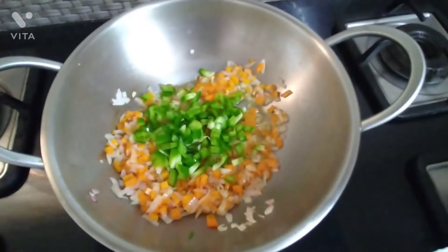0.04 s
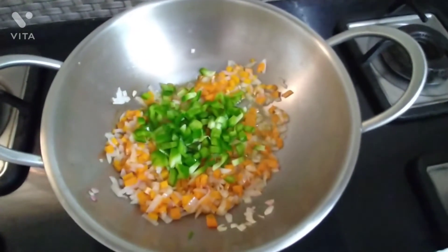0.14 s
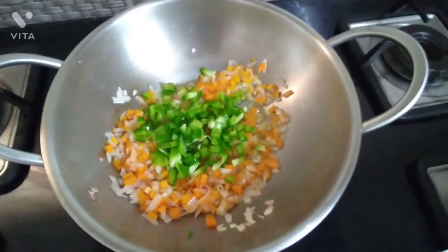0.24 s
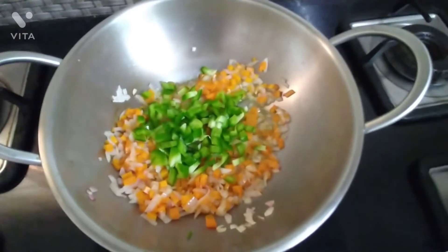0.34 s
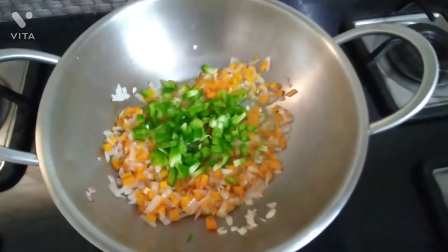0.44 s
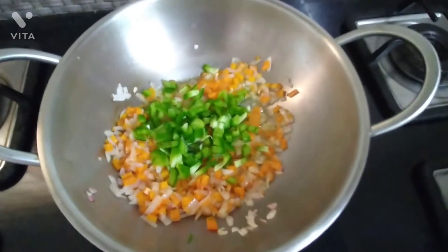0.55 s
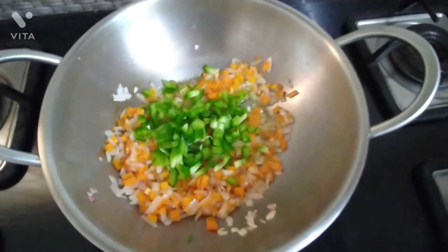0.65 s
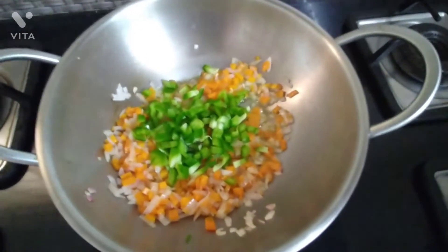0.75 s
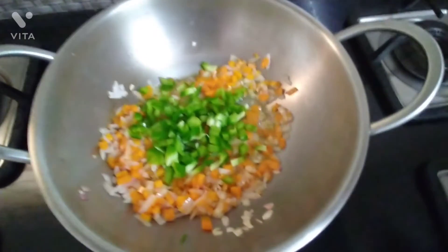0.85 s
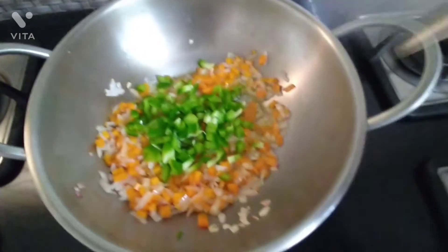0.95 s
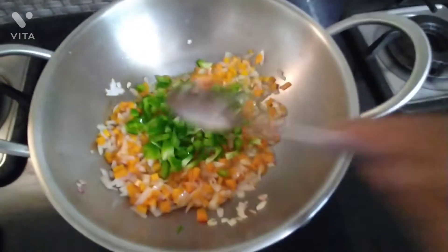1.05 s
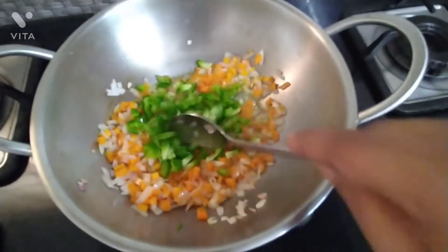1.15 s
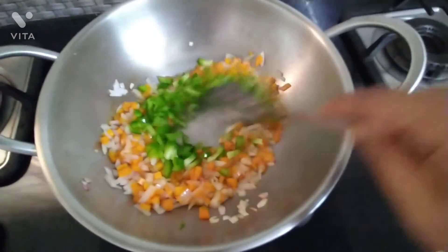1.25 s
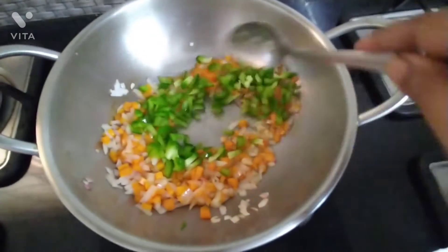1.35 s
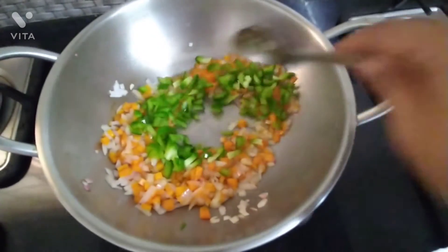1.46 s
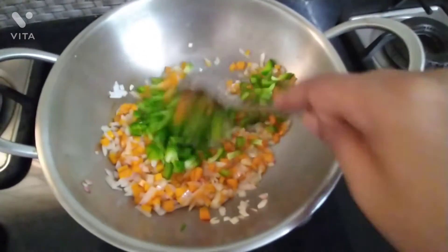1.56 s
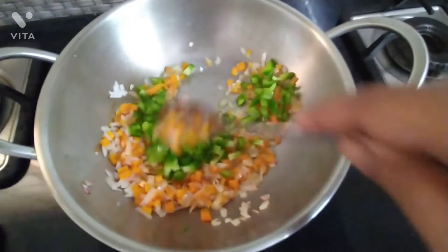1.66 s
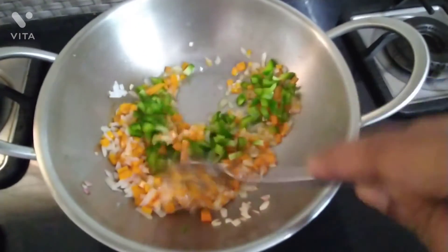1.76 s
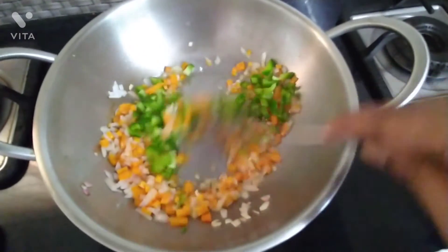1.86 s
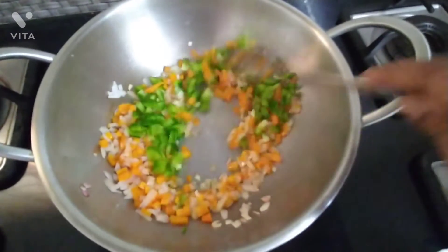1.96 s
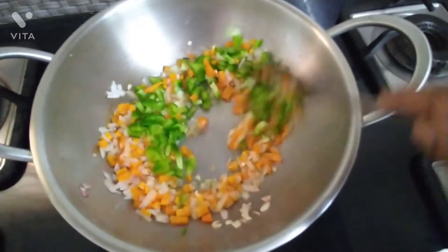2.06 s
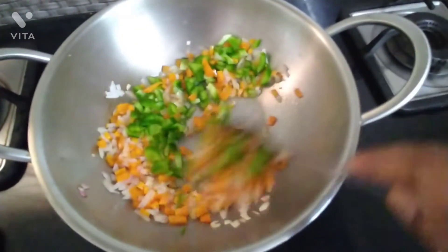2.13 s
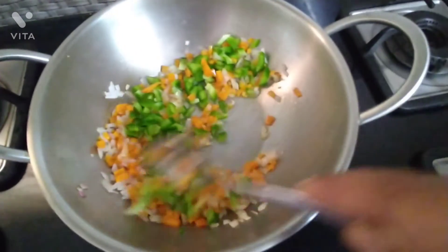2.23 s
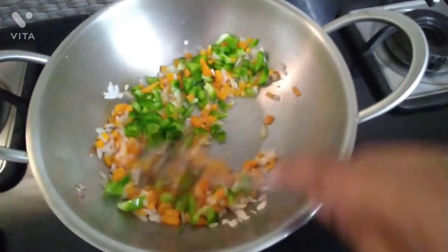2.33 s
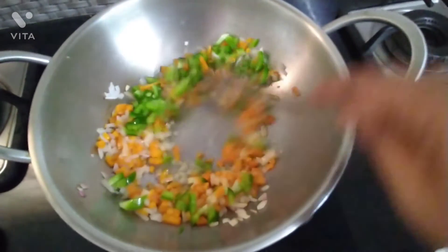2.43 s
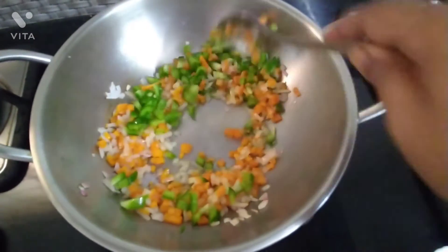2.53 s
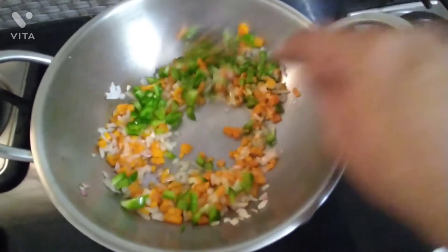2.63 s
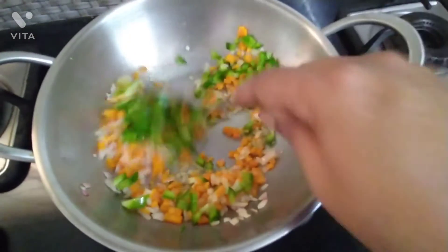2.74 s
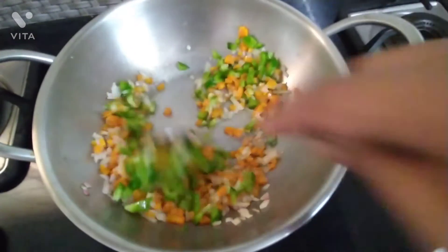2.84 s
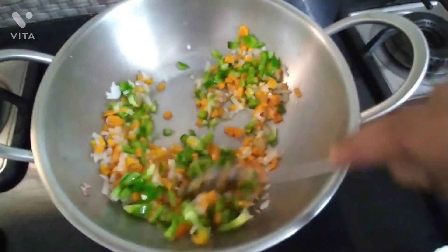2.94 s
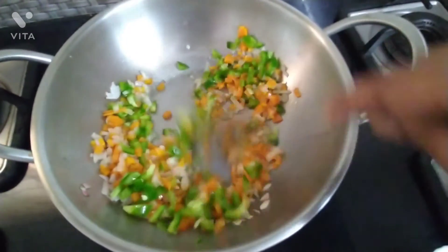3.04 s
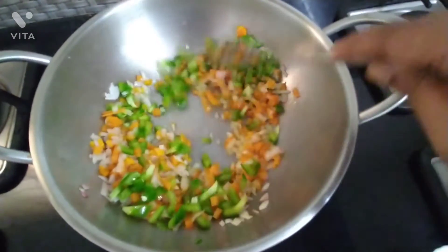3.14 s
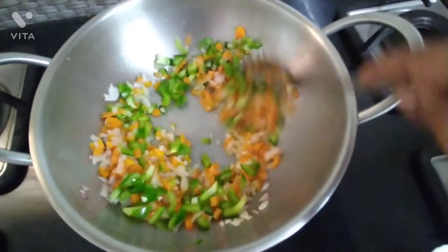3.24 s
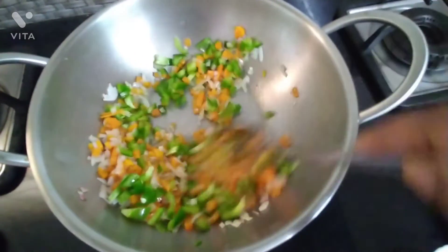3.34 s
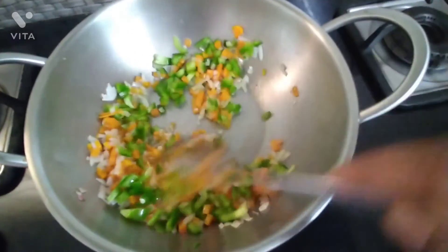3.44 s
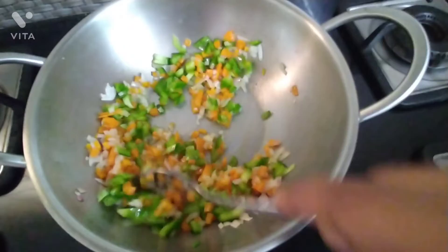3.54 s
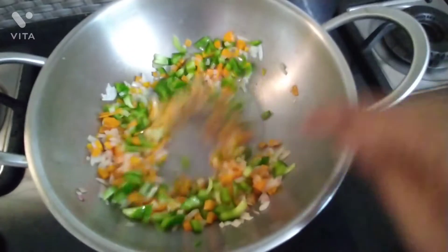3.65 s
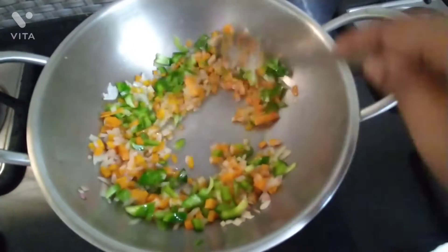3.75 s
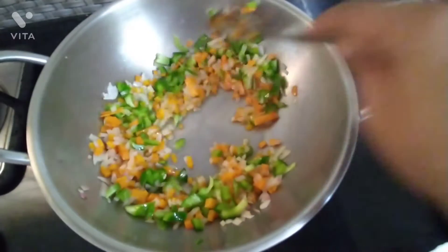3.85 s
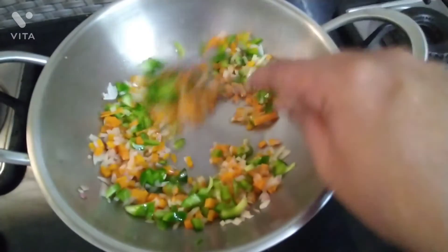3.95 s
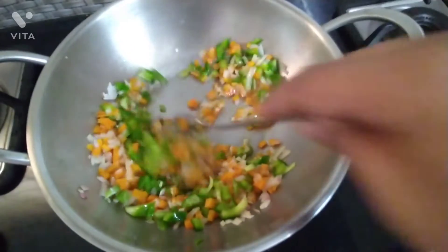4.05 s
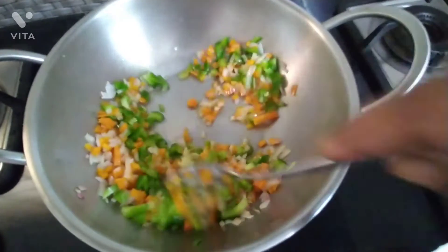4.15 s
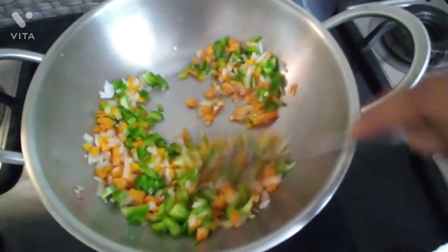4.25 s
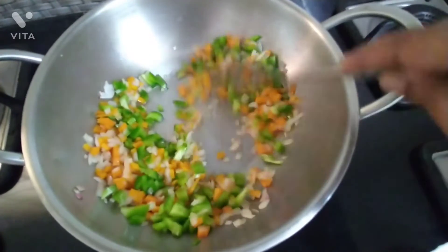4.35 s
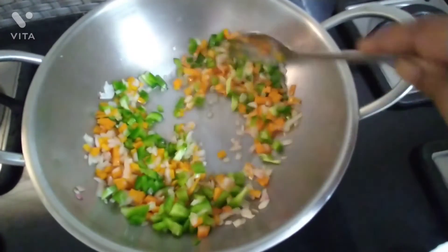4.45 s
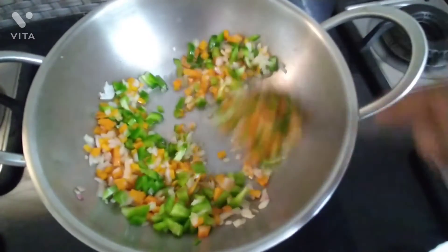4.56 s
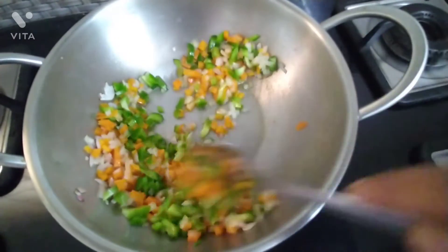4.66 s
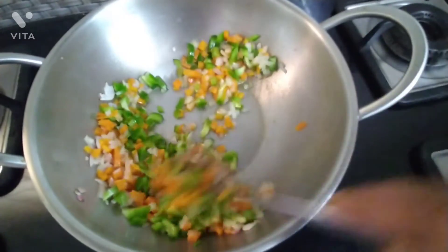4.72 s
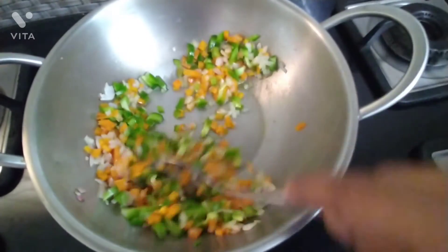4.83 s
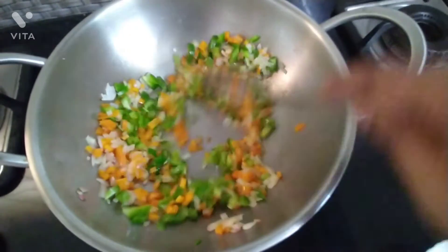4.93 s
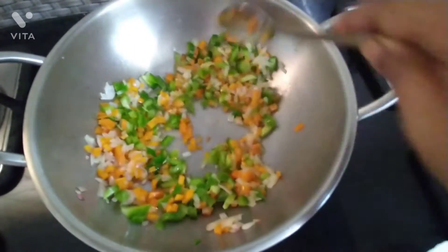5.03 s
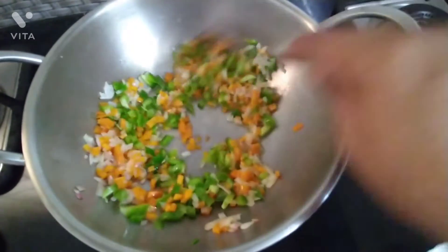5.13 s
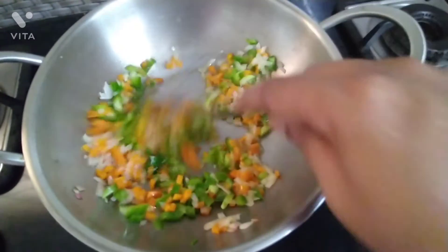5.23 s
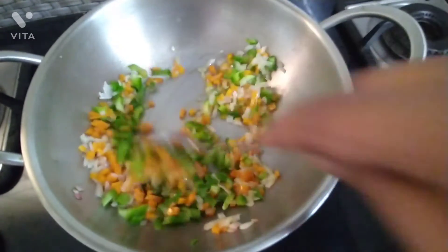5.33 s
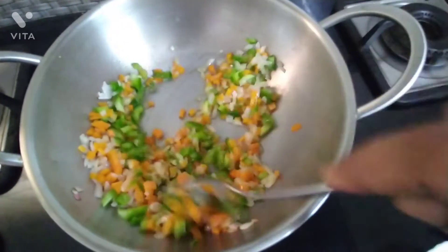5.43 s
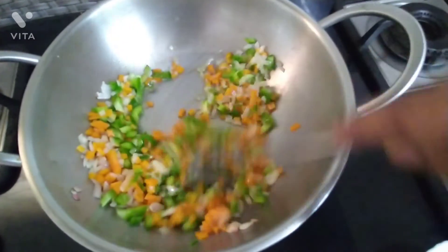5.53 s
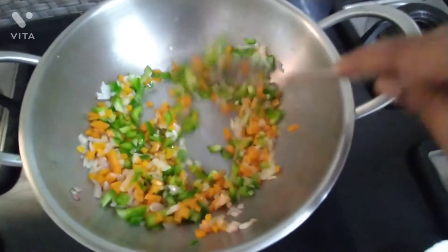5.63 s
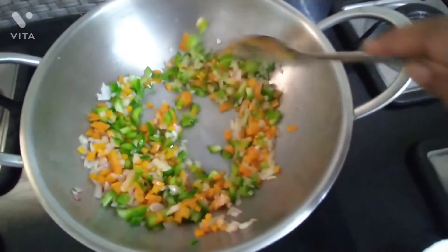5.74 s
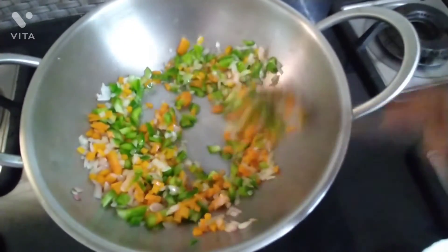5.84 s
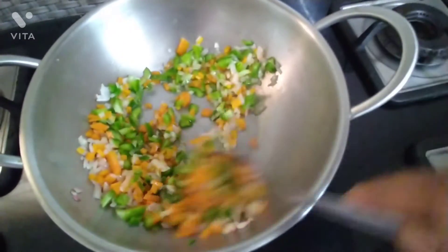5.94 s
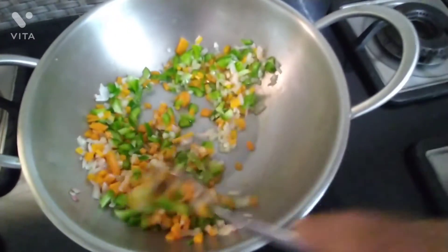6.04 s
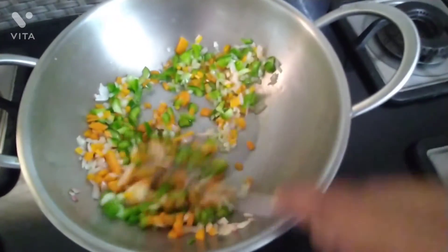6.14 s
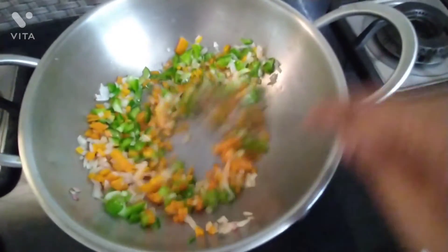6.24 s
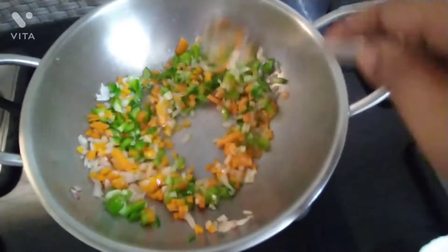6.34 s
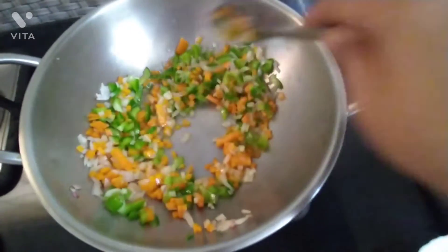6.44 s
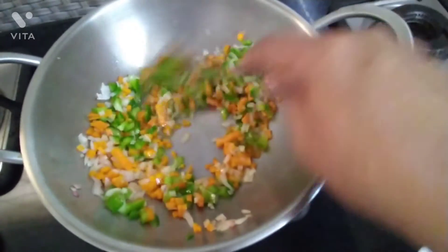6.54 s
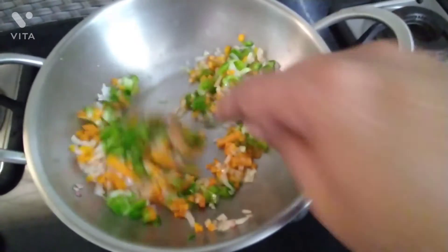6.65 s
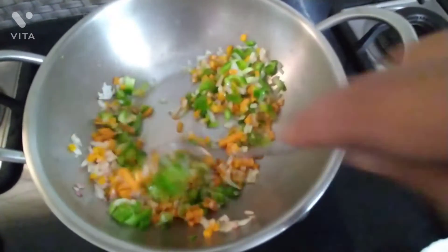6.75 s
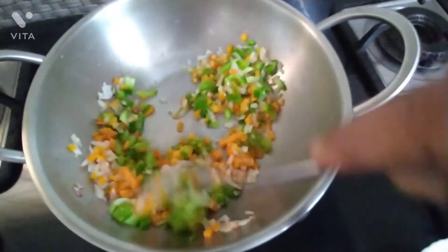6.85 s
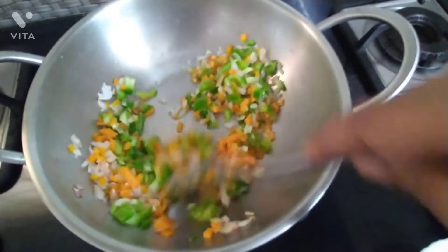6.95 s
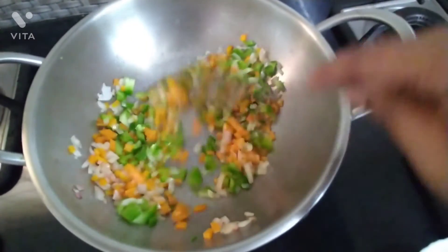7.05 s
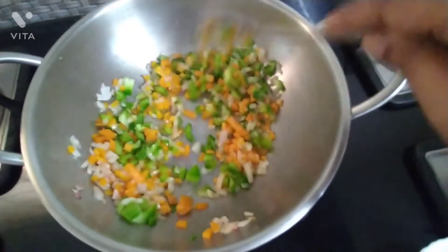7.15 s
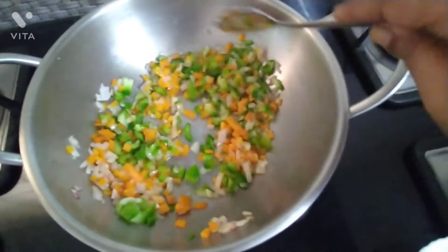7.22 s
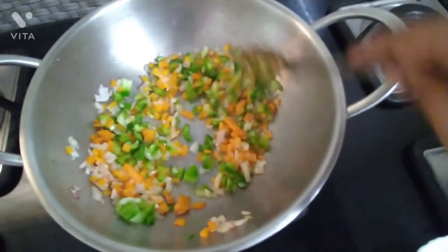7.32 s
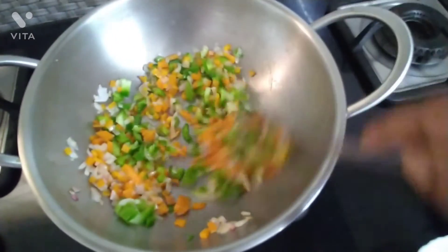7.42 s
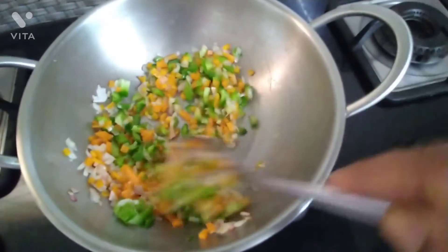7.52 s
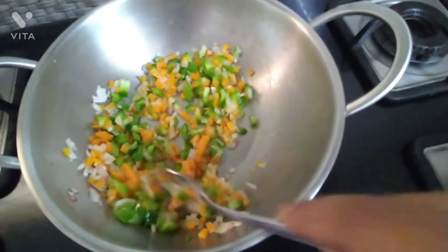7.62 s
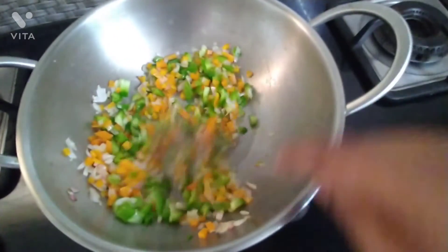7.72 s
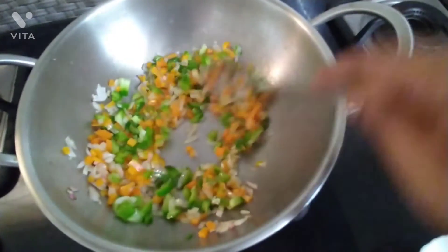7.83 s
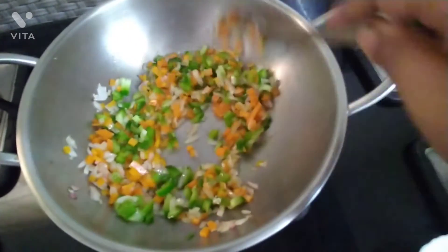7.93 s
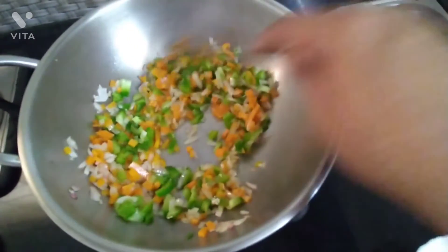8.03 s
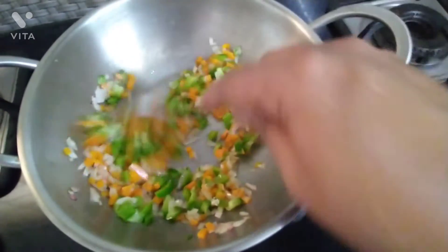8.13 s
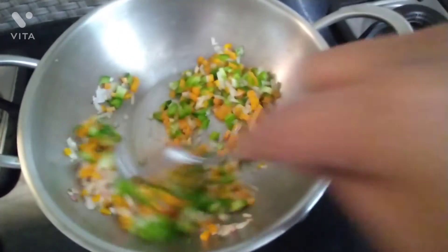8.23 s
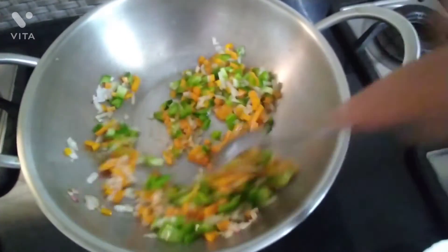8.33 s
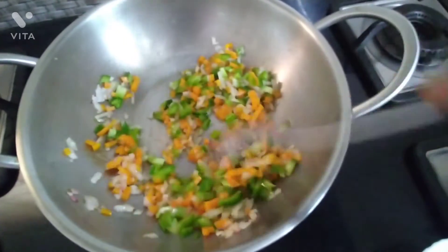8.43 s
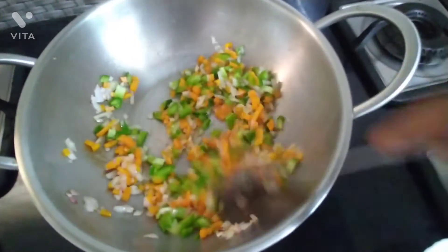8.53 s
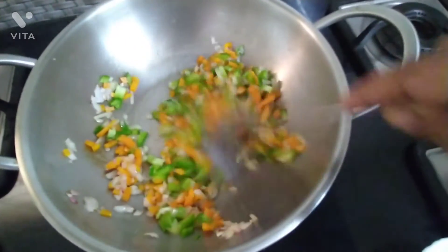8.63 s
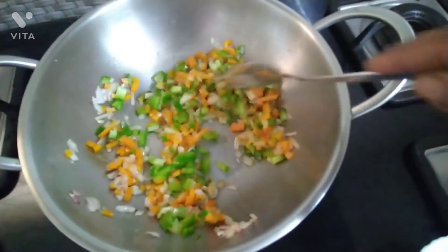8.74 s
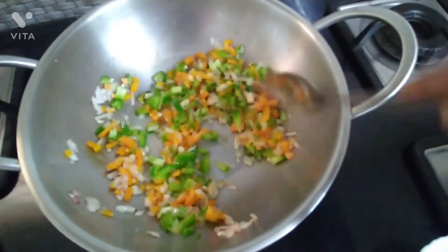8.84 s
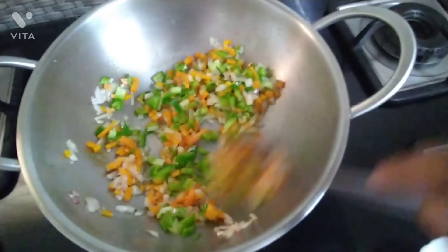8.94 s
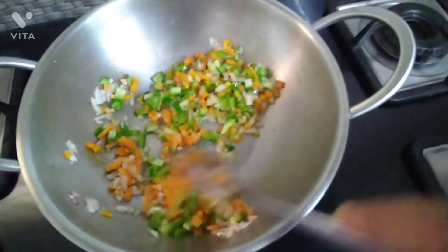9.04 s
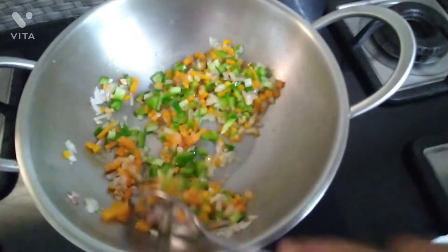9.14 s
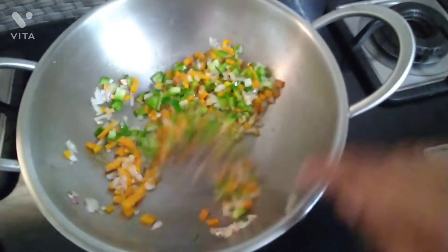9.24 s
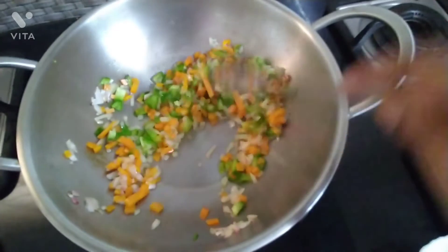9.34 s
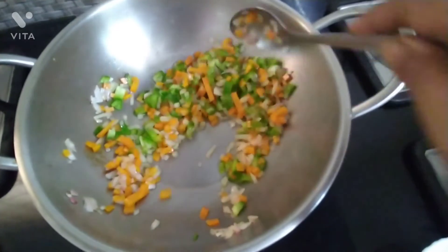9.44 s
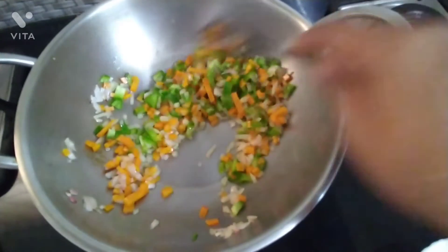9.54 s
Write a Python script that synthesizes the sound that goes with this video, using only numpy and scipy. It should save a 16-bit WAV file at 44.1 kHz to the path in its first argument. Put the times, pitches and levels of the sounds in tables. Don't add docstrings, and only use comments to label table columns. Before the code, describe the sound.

Close, dense frying crackle with uneven scraping of a spoon on steel, small squeaks and clinks, and two very hard clangs late on.

```python
import sys
import numpy as np
from scipy import signal
from scipy.fft import rfft, irfft, next_fast_len
from scipy.io import wavfile
from scipy.ndimage import uniform_filter1d

SR = 44100
rng = np.random.default_rng(int(sys.argv[2]) if len(sys.argv) > 2 else 0)


def magnitude_from_level(level_db):
    exponent = np.asarray(level_db, float) / 20
    return 10 ** exponent


def file_out(sig):
    cols = np.atleast_2d(sig).T
    lim = np.clip(cols, -1, 1)
    pcm = np.round(lim * 32767).astype(np.int16)
    wavfile.write(sys.argv[1], SR, pcm)


N = 422478

# f/Hz, level/dB, time to fade by 60 dB/s
PAN_MODES = [(180, -14, 0.66), (445, -14.5, 0.82), (658, -9, 0.24), (770, -9, 0.2), (908, -6.5, 0.15),
             (1120, -10, 0.15), (1239, -8, 0.33), (1709, -7.5, 0.17), (1930, -19, 0.044), (2153, -5, 0.57),
             (2200, -20, .1), (2480, -22, .07), (2580, -12.5, 0.27), (2730, -22, 0.16), (3030, -3.5, 0.045),
             (3500, -20, 0.1), (3780, -3, 0.092), (4520, -2.5, 0.034), (5340, 4, 0.055), (6500, -1, 0.023),
             (7000, -1.5, 0.03), (7630, -15, 0.072), (7770, -4, 0.08), (8500, -8, 0.02), (9520, 2, 0.031),
             (12450, -4.5, 0.035), (14420, -2, 0.02)]
# f/Hz, level/dB
PORT_LEVEL = [(60, 0.5), (110, 0.5), (200, 0.5), (380, -1.0), (700, 3.5), (1290, 5.0), (2380, 2.0),
              (4400, 4.5), (8120, 9.5), (15000, 11.0)]
# f/Hz, phase/rad
PORT_PHASE = [(0, 0), (430, 0.0), (690, 1.8), (1890, 2.1), (2150, 3.2), (2760, 2.7), (3100, 1.9),
              (3790, 4.4), (4130, 2.4), (5250, 1.4), (6200, 6.7), (9820, 5.6), (11600, 12.9), (15500, 12.6)]
# time of most pressure/s, drag level/dB, flare of the sizzle/dB, length/s
STROKES = [(0.097, -40, -0.5, 0.15), (0.63, -35.5, 0.5, 0.12), (1.367, -36, 5, 0.12),
           (1.673, -27, 8, 0.071), (1.97, -35.5, -0.5, 0.093), (2.235, -31.5, 1.5, 0.077),
           (2.583, -46, 6, 0.12), (2.867, -28, 0.5, 0.17), (3.25, -38, 2.5, 0.12), (3.473, -32, 1, 0.07),
           (3.807, -28.5, 4, 0.095), (4.11, -28, 0.5, 0.081), (4.456, -39, 2.5, 0.087),
           (4.692, -25.5, 2, 0.072), (5.036, -30.5, 2, 0.17), (5.25, -38, 1.5, 0.14), (5.373, -29, 3, 0.1),
           (5.774, -50, 3.5, 0.15), (5.97, -39, -4, 0.06), (6.352, -33, 4, 0.12),
           (6.727, -30.5, 1.5, 0.093), (7.185, -40, 3, 0.18), (7.51, -32, 3.5, 0.13),
           (7.905, -45, 3.5, 0.14), (8.242, -29, 4, 0.1), (8.728, -24.5, -0.5, 0.11),
           (8.854, -38, 4.5, 0.04), (9.03, -28.5, 3, 0.06), (9.35, -23, -2.5, 0.074)]
# t/s, peak level/dB, bowl ring against peak/dB, favoured mode f/Hz, left minus right/dB
BLOWS = [
    (0.121, -41, -12, 2810, -6),
    (5.238, -17, -14, 2700, 2),
    (5.9532, -28, -9, 766, 6),
    (7.382, -19.5, -5, 1120, 1),
    (7.5293, -29, 2.5, 764, 5),
    (8.6814, -5.5, -20, 4520, -5.5),
    (8.9972, -18.5, -1.5, 1239, 3),
    (9.2945, -5, -11, 1930, 2.5),
]


def on_hz(table, hz):
    f, value = np.transpose(table)
    return np.interp(np.log(hz + 300), np.log(f + 300), value)


def on_time(table):
    s, level = np.transpose(table)
    return np.interp(np.arange(N) / SR, s, level)


def unit(x):
    return x / np.sqrt(np.mean(x ** 2))


def walk(rate):
    hold = int(SR / rate)
    steps = np.repeat(rng.standard_normal(N // hold + 1), hold)
    smooth = uniform_filter1d(uniform_filter1d(steps, hold), hold)
    return unit(smooth[:N])


def swells(s, size, rise_s, fall_s):
    t, out = np.arange(0, N, 64) / SR, 0
    for peak, height, rise, fall in np.broadcast(s, size, rise_s, fall_s):
        before, after = np.minimum(t - peak, 0), np.maximum(t - peak, 0)
        out = out + height * np.exp(-(before / rise) ** 2 - (after / fall) ** 0.98)
    return np.interp(np.arange(N) / SR, t, out)


def grains(rate, spread_db):
    chance = rng.random((2, N))
    size = rng.exponential(size=(2, N))
    sign = rng.standard_normal((2, N))
    return unit((chance < rate / SR) * sign * magnitude_from_level(spread_db * size))


def bubbles(rate, spread_db, flicker_db, far_smooth, bright_db=0):
    size = next_fast_len(N)
    octave = np.maximum(np.log2(np.arange(1, size // 2 + 2) * SR / size), 8)
    shower = grains(rate, spread_db)
    shower[1] = unit(shower[1] + far_smooth * rng.standard_normal(N))
    out = 0
    for k, centre in enumerate(np.arange(8, 14.2, .6)):
        window = np.cos(np.clip((octave - centre) / .6, -1, 1) * np.pi / 2)
        flicker = flicker_db * (0.19 * walk(12) + 1.13 * walk(45))
        band_db = flicker + bright_db * np.clip(centre - 13.2, -1.5, 1)
        shifted = np.roll(shower, 30011 * k, axis=1)
        out = out + rfft(shifted * magnitude_from_level(band_db), size) * window
    return irfft(out, size)[:, :N]


def ports(pair, colour, tilt=1):
    # f/Hz, likeness/0-1
    likeness = [(60, 1), (200, 0.94), (400, 0.93), (800, 0.2), (2000, 0), (5000, 0.41), (12000, 0)]
    size = next_fast_len(N)
    hz = np.arange(size // 2 + 1) * SR / size
    a, b = rfft(pair, size)
    like = np.clip(on_hz(likeness, hz), 0, 1)
    b = like * a * np.exp(-1j * on_hz(PORT_PHASE, hz)) + np.sqrt(1 - like ** 2) * b
    lean = magnitude_from_level(tilt * on_hz(PORT_LEVEL, hz) / 2)
    lean = np.array([lean, 1 / lean]) / np.sqrt(lean ** 2 + lean ** -2)
    return unit(irfft(np.array([a, b]) * lean * magnitude_from_level(on_hz(colour, hz)), size)[:, :N])


def steel(drive, damping=1, modes=PAN_MODES):
    out = np.zeros((2, N))
    for k, (hz, db, t60) in enumerate(modes):
        pole = np.exp(2j * np.pi * hz / SR - damping * np.log(1000) / (t60 * SR))
        z = signal.lfilter([1], [1, -pole], drive(k, hz, t60))
        lean = magnitude_from_level(0.49 * on_hz(PORT_LEVEL, hz) / 2)
        right = (z * np.exp(-1j * on_hz(PORT_PHASE, hz))).imag
        out += magnitude_from_level(db) * np.array([lean * z.imag, right / lean])
    return out


def lifted():
    s, db = np.transpose(BLOWS)[:2]
    return swells(s - .02, np.clip((db + 40) / 15, 0, 1), rise_s=0.067, fall_s=0.0095)


def touches():
    # t/s, peak level/dB, edge clank against peak/dB, favoured mode f/Hz, left minus right/dB
    tap_table = [(1.3532, -26, 0, 2600, 6), (1.6534, -14.5, 4, 4000, 0), (2.2176, -36, 12, 1710, 10),
                 (2.7648, -27.5, 19.5, 2180, 4), (2.8508, -17, -5, 3800, 8.5), (3.1266, -29, -10, 3860, 0),
                 (3.2318, -27, 13, 3790, 3), (3.4848, -14.5, 9, 3550, 0), (3.764, -25.5, 14, 3820, 9),
                 (4.1, -13, 4, 3800, -5), (4.1932, -35, -2, 3920, 4), (4.4247, -19.5, -1, 2580, 6),
                 (4.7004, -23, 8, 4800, 2), (5.02, -32, 12, 2560, 4), (5.336, -24, 8, 4040, 7),
                 (6.3396, -29, 10, 3930, 7), (6.7194, -23, 14, 3580, -7), (8.229, -21, 4, 3400, 6),
                 (8.77, -21, 8, 5340, 9), (9.388, -29, -8, 3800, -11)]
    hits = []
    for s, db, edge_db, hz, pan_db in tap_table:
        bowl_db = -23 - 0.44 * (db + 31)
        hits.append((s, db, bowl_db, edge_db, hz, pan_db))
    for s, db, bowl_db, hz, pan_db in BLOWS:
        edge_db = -1 - 1.2 * (db + 19)
        hits.append((s, db, bowl_db, edge_db, hz, pan_db))
    return np.transpose(sorted(hits))


def drag_level():
    # t/s, drag level/dB
    weight = [
        (0.0, -38),
        (0.3, -58),
        (1.25, -51),
        (1.45, -39.5),
        (2.9, -32.5),
        (5.4, -33.5),
        (5.6, -32.5),
        (8.4, -32),
        (9.58, -29.5),
    ]
    s, press_db, _, length = np.transpose(STROKES)
    resting = magnitude_from_level(on_time(weight) - 7 * lifted())
    return resting + swells(s, magnitude_from_level(press_db), 0.63 * length, 0.71 * length)


def stove_rumble(drag):
    # f/Hz, level/dB
    stove_colour = [(12, -52), (20, -32), (49, -12), (73, -5.5), (91, 2.5), (107, 2), (129, -4), (182, -1),
                    (239, -19.5), (400, -12.5), (520, -31), (880, -120)]
    # t/s, peak level/dB
    jolts = [(0.076, -27), (1.653, -39), (1.795, -33), (1.959, -31), (2.2, -23), (2.46, -28), (2.585, -52),
             (2.894, -36), (3.089, -36), (3.407, -28), (3.588, -31), (3.749, -39), (3.986, -38),
             (4.139, -41), (4.379, -40), (4.664, -33), (4.799, -31), (4.999, -46), (5.241, -30),
             (5.409, -36), (6.199, -50), (6.784, -33), (7.237, -36), (7.425, -25), (7.799, -35),
             (8.285, -35), (8.491, -30), (8.675, -31), (9.006, -27), (9.439, -24)]
    s, db = np.transpose(jolts)
    rise_s, fall_s = 0.0069, 0.056
    burner = magnitude_from_level(-52)
    rocking = swells(s + rise_s, magnitude_from_level(db - 10), rise_s, fall_s)
    shake = burner + magnitude_from_level(-23.0) * drag + rocking
    roar = rng.standard_normal((2, N)) * magnitude_from_level(0.71 * walk(7))
    return ports(roar, stove_colour) * shake


def pings():
    # t/s, f/Hz, peak level/dB, time to fade by 60 dB/s
    ping_table = [(0.005, 178.6, -35, .5), (0.068, 172, -31, .15), (0.085, 190, -28, 0.12),
                  (0.09, 1300, -37, .1), (0.165, 180, -37, 0.23), (2.775, 2155, -36, .5),
                  (2.85, 2155, -31, .3), (5.238, 2710, -22.5, .16), (5.238, 658, -33.5, 0.18),
                  (5.295, 2155, -31, .3), (5.38, 2155, -31, .35), (5.95, 658, -35, 0.18),
                  (7.382, 1239, -23.5, 0.5), (7.383, 1790, -19, 0.03), (7.3897, 1770, -19, 0.03),
                  (7.383, 900, -36, 0.47), (8.681, 440, -38, 0.98), (8.6811, 1239, -25, 0.33),
                  (8.6811, 2580, -22, .07), (8.6811, 3500, -10, .05), (8.6811, 3100, -20, .06),
                  (9.2945, 3130, -22, .07), (8.7, 2153, -26, .45), (8.998, 664, -24, 0.3),
                  (8.998, 904, -33, .2), (8.998, 2153, -32, .5), (9.295, 183, -34, 1.35),
                  (9.295, 664, -32, 0.17), (9.295, 1120, -26, .33), (9.2945, 2153, -33, .6),
                  (9.2945, 2290, -29, .3), (8.9972, 1400, -28, .1), (8.9972, 1020, -27, .1),
                  (9.2945, 2520, -16, .1), (9.39, 3800, -17, .04), (9.3868, 5950, -8, .03),
                  (9.3895, 5400, -11, .045), (9.2938, 7300, -8, .07), (9.2938, 7900, -8, .05),
                  (9.294, 10040, -12, .04), (8.6815, 4400, -17, .04), (8.6815, 5600, -17, .04),
                  (8.686, 2580, -16, .06), (8.6815, 10450, -10, .03), (8.685, 9400, -12, .05),
                  (2.851, 3810, -15, .035), (2.851, 5000, -14, .04), (4.102, 5300, -13, .06),
                  (4.701, 4470, -17, .04), (9.39, 2970, -31, 0.2)]
    out, t = np.zeros((2, N + SR)), np.arange(SR) / SR
    for s, hz, db, t60 in ping_table:
        fade = magnitude_from_level(db - 60 * t / t60) * np.minimum(t / 0.0013, 1)
        z = fade * np.exp(2j * np.pi * hz * t)
        right = (z * np.sqrt(np.exp(-1j * on_hz(PORT_PHASE, hz)))).imag
        lean, i = magnitude_from_level(on_hz(PORT_LEVEL, hz) / 4), int(s * SR)
        out[:, i:i + SR] += np.array([lean * z.imag, right / lean])
    return out[:, :N] * magnitude_from_level(2.1 * walk(40))


def whistle():
    # f/Hz, level/dB, time to fade by 60 dB/s
    spoon_modes = [(5340, -1.5, 0.047), (7340, 0, .015), (7770, -2.5, 0.066), (8820, -9, .025),
                   (9550, -3, .045), (9900, -6, 0.039), (10700, -10, .06), (11600, -10, .04),
                   (12700, -2, .03), (13850, -5, .035), (14000, -3.5, .04), (14900, -6, .03),
                   (15250, -7, .05), (15550, -3, .035)]
    # t/s, level/dB
    whistle_level = [(0, -48), (1.3, -46), (2.4, -34), (3.2, -34), (3.45, -18), (3.7, -27), (3.9, -18.5),
                     (4.3, -24), (4.6, -31), (5.1, -30), (5.5, -30), (5.9, -39), (6.8, -30), (7.4, -29),
                     (8.4, -30), (9.0, -28), (9.58, -39)]
    slips = grains(rate=9000, spread_db=2.0)[0]
    sway = [magnitude_from_level(3.8 * walk(14)) for _ in range(3)]

    def rub(k, hz, t60):
        return np.roll(slips * sway[k % 3], 9973 * k) / np.sqrt(t60)
    return unit(steel(rub, modes=spoon_modes)) * magnitude_from_level(on_time(whistle_level))


def skids():
    # t/s, peak level/dB,
    # squeak f/Hz, length/s, left minus right/dB
    skids_and_spits = [(0.1306, -9, 10000, .003, 12), (0.7033, -12, 9180, .003, 10),
                       (1.9066, -13, 9840, .003, 19), (3.015, -12, 8460, .004, 8), (6.7695, -19, 10400, .003, 8),
                       (8.1439, -5, 8750, 0.0055, 10), (1.35, -12, 6280, 0.04, 4), (1.655, -14.5, 5200, 0.04, 3),
                       (2.0694, -15, 7620, 0.026, 8), (2.564, -15, 8950, 0.03, 8.0),
                       (2.8504, -10, 5170, 0.012, 4), (2.856, -10, 7300, .01, 7), (3.484, -13, 7770, 0.034, 0),
                       (3.7655, -11, 6000, .01, 5), (4.0996, -9, 7400, 0.014, -3), (4.12, -11, 9400, .008, 9),
                       (4.672, -10, 8800, 0.013, 6), (4.6997, -4, 5130, 0.0058, 3),
                       (5.004, -12.5, 5460, 0.039, 7), (5.2365, -6.5, 7340, .015, 2),
                       (5.31, -12.5, 8000, .04, 4), (5.3364, -9.5, 5340, 0.023, 10), (5.922, -2, 9000, .0015, 7),
                       (6.3385, -4.5, 5930, 0.01, 4), (7.1594, -13, 7420, 0.066, 4),
                       (7.381, -2.5, 8500, 0.011, 2), (7.525, -17, 5100, 0.027, 0),
                       (7.824, -13, 8840, 0.031, 14), (7.916, -12, 7450, 0.025, 6.5),
                       (8.677, -19, 8950, 0.03, 2), (8.769, -9.5, 7900, 0.023, 5),
                       (8.9984, -13.5, 5140, 0.017, 0), (8.9984, -10, 7000, .007, 3),
                       (8.697, -12, 7350, .015, 4), (9.2515, -3, 9500, .0012, 12), (9.287, -6, 7200, 0.021, 0),
                       (9.2815, -2, 10500, .0007, 11), (9.383, -11, 5500, 0.01, 0)]
    # t/s, peak level/dB, squeak f/Hz, length/s, left minus right/dB
    bowl_squeaks = [
        (1.3538, -24.5, 2520, 0.065, 2),
        (1.6894, -33, 2480, 0.086, 1.5),
        (2.8294, -35, 2490, 0.05, 3),
        (4.0394, -28, 2220, 0.044, -8),
    ]
    # t/s, peak level/dB, f/Hz, length/s, left minus right/dB
    pan_settles = [
        (0.066, -35, 340, .012, 0),
        (0.086, -36, 440, 0.017, 3),
        (0.062, -39, 1030, .015, 3),
        (0.088, -36, 850, 0.018, 3),
    ]
    out, t, knock_s = np.zeros((2, N)), np.arange(SR // 6) / SR, touches()[0]
    kinds = (skids_and_spits, 1030), (bowl_squeaks, 210), (pan_settles, 360)
    for s, db, hz, length, pan_db, width in [(*row, width) for table, width in kinds for row in table]:
        roughness_db = 2.5 * rng.standard_normal(len(t) // 100 + 1).repeat(100)[:len(t)]
        rub = rng.standard_normal((2, len(t))) * magnitude_from_level(roughness_db)
        rub[1] += 0.99 * rub[0]
        partials = hz + width * (np.array([-0.406, 0.015, 0.8, 1.86]) + 0.093 * rng.standard_normal(4))
        tone = 0
        for f, part_db in zip(partials, (3.5, 9.8, 1.7, -3)):
            sharpness = np.clip(f / (0.056 * width), 1, 60)
            b, a = signal.iirpeak(np.clip(f, 100, 15000), sharpness, fs=SR)
            tone = tone + magnitude_from_level(part_db) * signal.lfilter(b, a, rub)
        shape = np.minimum(t / 0.001, 1) * np.exp(-(t / length) ** 0.96)
        power = np.mean(np.average(tone ** 2, axis=1, weights=shape ** 2))
        side_db = np.array([[pan_db], [-pan_db]]) / 2
        touch = knock_s[np.argmin(abs(knock_s - s))]
        start = touch if abs(touch - s) < .01 else s
        i = int(start * SR)
        out[:, i:i + len(t)] += tone / np.sqrt(power) * shape * magnitude_from_level(db - 4.5 + side_db)
    return out


def stirring(drag):
    # f/Hz, level/dB
    drag_colour = [(120, -37), (200, -18), (242, -30), (361, -52), (546, -19), (660, -9.5), (1250, -16),
                   (1400, -11.5), (1660, -11.5), (2560, -8.5), (9000, -13), (11700, -24), (19800, -120)]
    slips = bubbles(rate=15000, spread_db=2.0, flicker_db=3.0, far_smooth=0.78)
    rasp = ports(slips, drag_colour) * drag * magnitude_from_level(-3)
    catch_db = 1.5 * walk(20)
    push = slips[0] * drag * magnitude_from_level(1 + 2 * walk(8) + catch_db)

    def stir(k, hz, t60):
        mode_db = 3.0 + 1.6 * np.log2(hz / 2000) - 2.1 * (hz > 4500) - 3.5 * (hz < 700)
        return np.roll(push, 97 * k) / np.sqrt(t60 * SR) * magnitude_from_level(mode_db)
    return rasp + steel(stir, damping=1.64)


def knocks():
    s, peak_db, bowl_db, edge_db, spot_hz, pan_db = touches()
    at = (s * SR).astype(int)
    spot_db = 1.5 * rng.standard_normal((len(s), len(PAN_MODES)))

    def hit(k, hz, t60):
        x = np.zeros(N)
        low = np.clip(np.log2(1800 / hz), 0, 1)
        high = np.clip(np.log2(hz / 3500), 0, 1)
        favour_db = 11.1 * np.exp(-((hz / spot_hz - 1) / 0.073) ** 2)
        x[at] = magnitude_from_level(peak_db - 9.5 + spot_db[:, k] + favour_db + low * (bowl_db + 5.0) + high * edge_db)
        return x + magnitude_from_level(-11) * np.roll(x, int(.0073 * SR))
    out, lean = steel(hit), np.zeros(N)
    t = np.arange(SR // 10) / SR
    crack_colour = [(500, -10.5), (1500, -9.0), (2600, 2), (5500, -2.5), (9000, 6.5), (15000, 1.0)]  # f/Hz, level/dB
    crack = ports(rng.standard_normal((2, N)), crack_colour, tilt=0.28)
    fade = magnitude_from_level(-0.5) * np.exp(-t / 0.0068) + magnitude_from_level(-12.0) * np.exp(-t / 0.015)
    for i, db, pan in zip(at, peak_db, pan_db):
        out[:, i:i + len(t)] += magnitude_from_level(db) * fade * crack[:, i:i + len(t)]
        lean[i:] = pan
    return out * magnitude_from_level(np.array([lean, -lean]) / 2)


def sizzle():
    # f/Hz, level/dB
    sizzle_colour = [(150, -60), (260, -28.5), (450, -34), (700, -30), (1500, -27.5), (2200, -24),
                     (3300, -18), (4500, -9.5), (6200, -9.5), (8200, -4), (10200, 1.5), (12500, -5),
                     (15800, -12)]
    # t/s, sizzle level/dB
    heat = [(0.0, -25), (1.25, -24.5), (1.5, -23.5), (1.87, -23.5), (2.05, -19.5), (2.5, -22), (3.15, -20),
            (3.42, -17.5), (3.95, -17.5), (4.55, -19), (5.3, -20), (5.55, -21), (5.95, -18), (7.0, -21.5),
            (7.3, -18.5), (8.3, -19.5), (8.6, -19.5), (9.58, -20)]
    s, _, flare_db, length = np.transpose(STROKES)
    heat_db = on_time(heat)
    flare_db = swells(s, 1.24 * 0.72 * flare_db, 0.42 * length, 0.71 * length)
    level_db = heat_db + flare_db - 0.5 * lifted()
    bright_db = 0.39 * heat_db - 0.42 * flare_db
    bright_db -= bright_db.mean()
    fizz = bubbles(rate=12000, spread_db=1.5, flicker_db=1.05, far_smooth=1.25, bright_db=bright_db)
    spits = magnitude_from_level(-14) * grains(rate=150, spread_db=2.0) * magnitude_from_level(np.array([[0], [-9.0]]))
    spits -= uniform_filter1d(spits, size=5)
    return ports(fizz + spits, sizzle_colour, tilt=1.39) * magnitude_from_level(level_db + 4)


def scene():
    drag = drag_level()
    return stove_rumble(drag) + pings() + whistle() + skids() + stirring(drag) + knocks() + sizzle()


def on_blow():
    s = np.transpose(BLOWS)[0]
    return np.clip(swells(s + .02, 1.66, .04, 0.11), 0, 1)


def patchy(x):
    # t/s, f/Hz, width/Hz, length/s
    gaps = [(0.12, 5900, 400, .04), (1.4, 6500, 350, .03), (1.71, 6500, 350, .04), (1.89, 2200, 250, .04),
            (3.2, 6500, 450, .03), (5.2, 2250, 200, .04), (8, 3400, 250, .04), (3.94, 1950, 250, .04),
            (4.128, 2000, 250, .03), (4.127, 3400, 300, .03), (4.16, 7100, 300, 0.055),
            (4.52, 3360, 300, .04), (4.623, 6800, 400, 0.036), (5.4, 6500, 400, 0.054),
            (4.84, 6300, 550, 0.045), (4.89, 6600, 350, .04), (5.99, 7100, 400, .06), (8.7, 6500, 600, .04),
            (7.42, 6500, 450, 0.036), (7.4, 7700, 350, .03), (6.6, 7750, 300, .04), (7.67, 6500, 400, .035),
            (7.68, 7200, 500, .03), (7.1, 6500, 350, .04), (7.82, 7500, 350, .025), (8.02, 4450, 250, .04),
            (7.88, 6500, 500, .025), (5.53, 7050, 300, .04), (5.5, 4050, 300, .035),
            (5.7, 6400, 500, 0.045), (6.71, 6500, 450, .03), (5.2, 3700, 200, .035),
            (8.255, 6300, 800, .04), (8.48, 2200, 300, .05), (8.725, 7200, 620, .05),
            (8.74, 6600, 510, 0.1), (8.718, 3700, 250, .04), (9.02, 1960, 250, .05),
            (9.09, 2740, 250, 0.048), (9.09, 8700, 270, .03), (9.23, 2650, 250, .03),
            (9.335, 9300, 350, .04), (9.335, 3400, 250, 0.052), (9.55, 6400, 300, .04)]
    # f/Hz, spread/dB
    jump_spread = [(300, 0.8), (1000, 3.2), (2500, 2.55), (4500, 1.3), (6500, 5.4), (8500, 3.6),
                   (10000, 0.85), (15000, 1.6)]
    # f/Hz, share of patches/0-1
    drop_share = [(1000, 0.0022), (1800, .025), (3500, .012), (4800, 0), (6000, .04), (6800, .09),
                  (8000, .045), (9000, 0.004)]
    hz, s, z = signal.stft(x, SR, nperseg=1024)
    rows, columns = len(hz), len(s)
    jump = rng.standard_normal((rows // 7 + 1, columns // 2 + 1))
    jump = jump.repeat(7, axis=0).repeat(2, axis=1)[:rows, :columns]
    gain_db = on_hz(jump_spread, hz)[:, None] * (jump - 0.45 * jump ** 2 + 0.23)
    luck = rng.random((rows // 5 + 1, columns // 3 + 1))
    luck = luck.repeat(5, axis=0).repeat(3, axis=1)[:rows, :columns]
    gain_db += -18 * (luck < on_hz(drop_share, hz)[:, None])
    gain_db *= 1 - np.interp(s, np.arange(N) / SR, on_blow())
    for at, centre, width, length in gaps:
        band = np.exp(-(2 * (hz - centre) / width) ** 4)
        moment = np.exp(-(2 * (s - at) / length) ** 4)
        gain_db = gain_db - 40 * np.outer(band, moment)
    return signal.istft(z * magnitude_from_level(gain_db), SR, nperseg=1024)[1][:, :N]


def low_pass(x):
    return signal.sosfilt(signal.butter(12, 15800, fs=SR, output="sos"), x)


def record(dry):
    mix = np.clip(patchy(dry), -1, 1)
    return low_pass(mix)


dry = scene()
out = record(dry)
file_out(out)
```